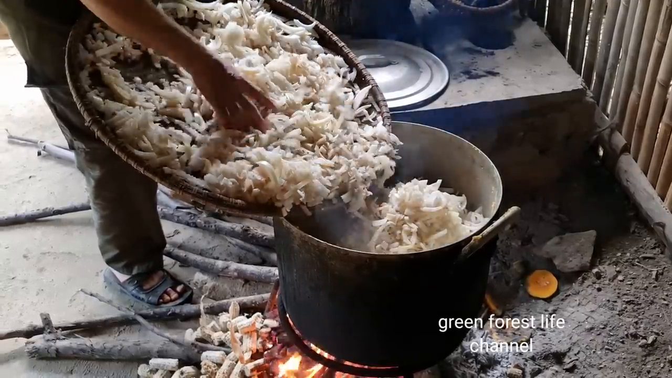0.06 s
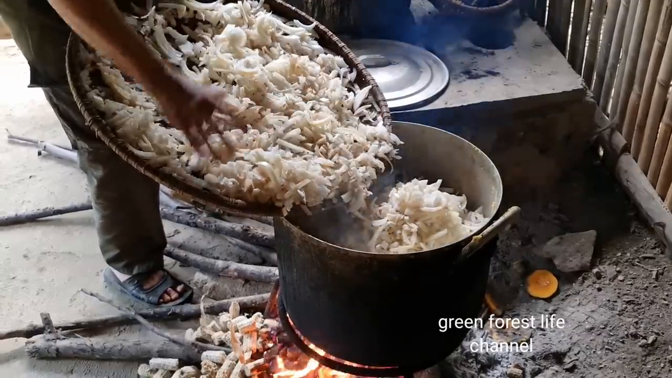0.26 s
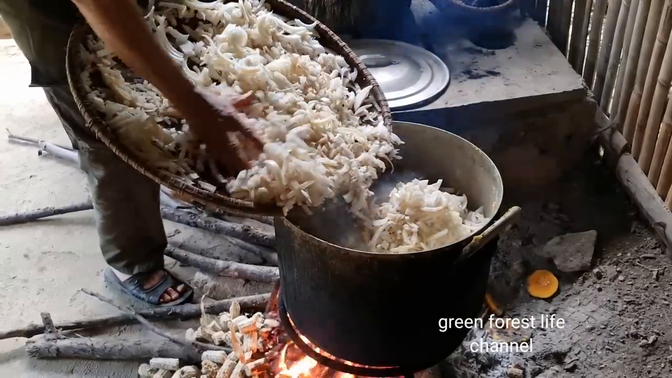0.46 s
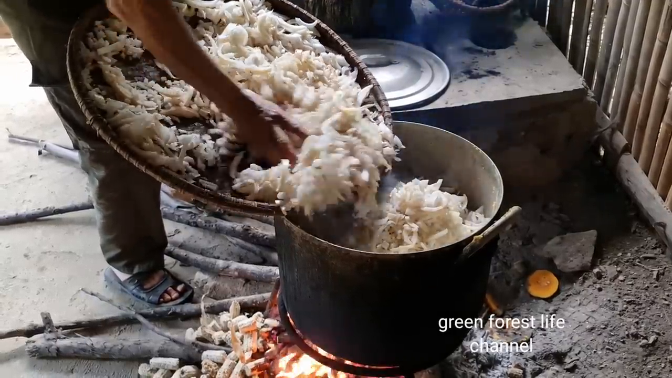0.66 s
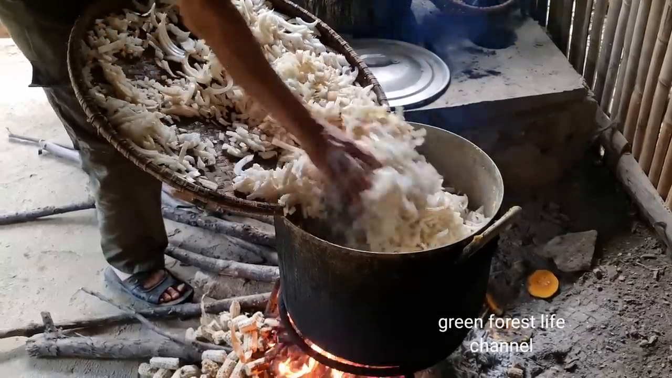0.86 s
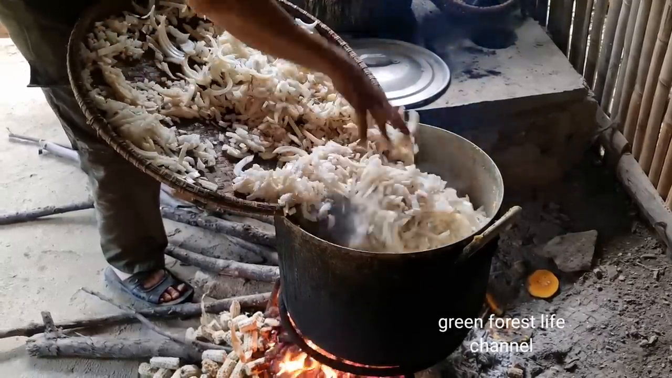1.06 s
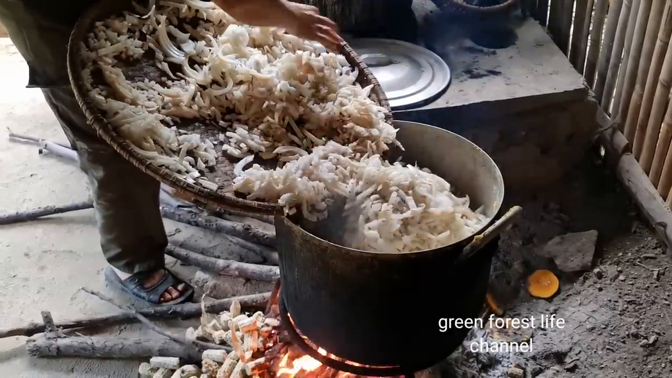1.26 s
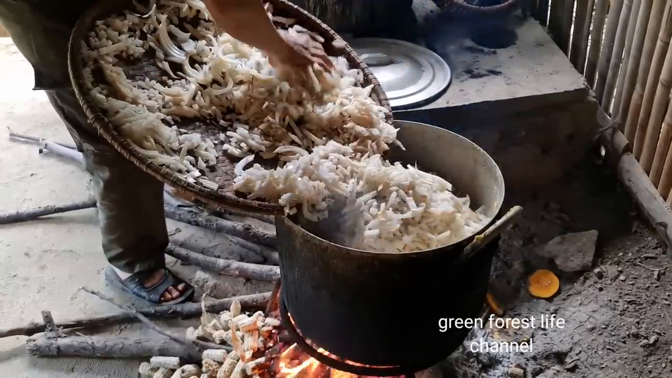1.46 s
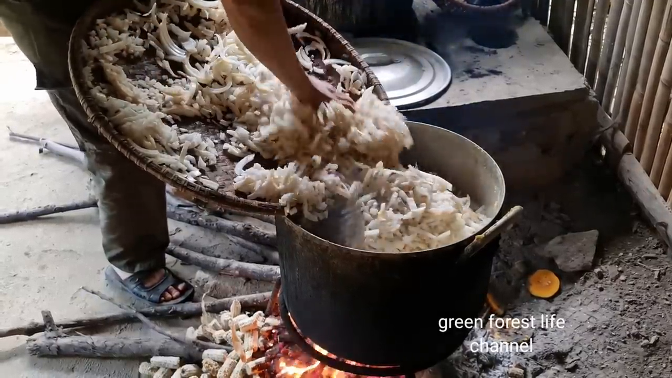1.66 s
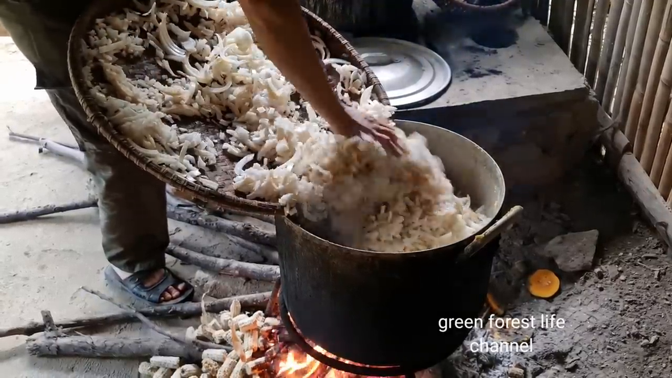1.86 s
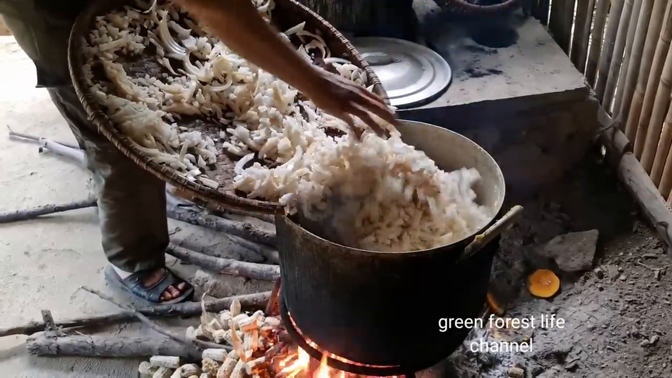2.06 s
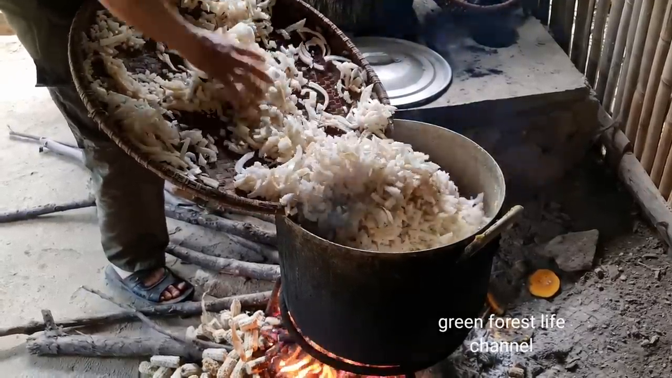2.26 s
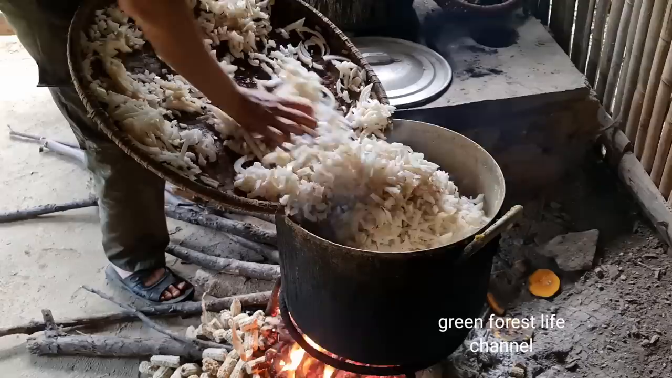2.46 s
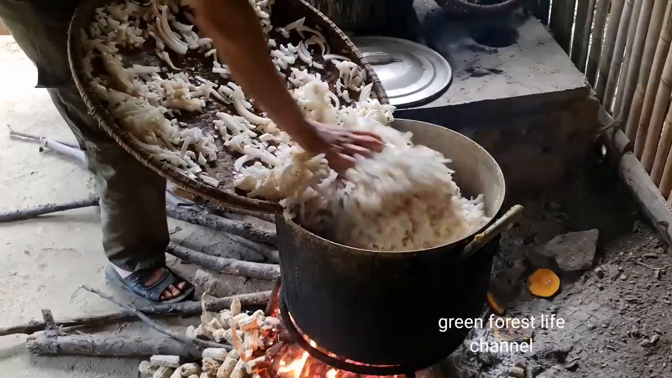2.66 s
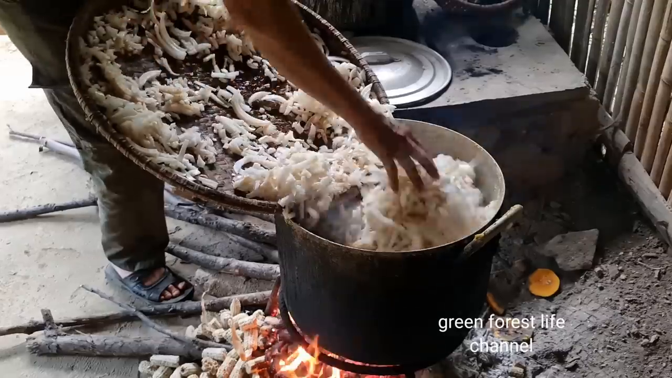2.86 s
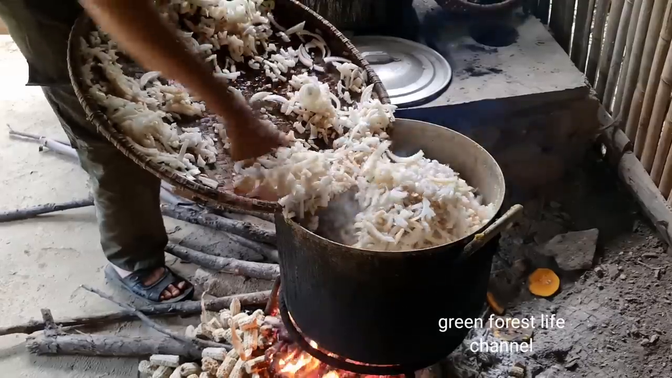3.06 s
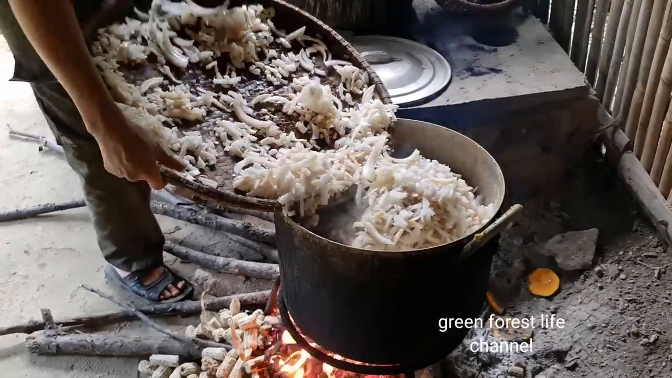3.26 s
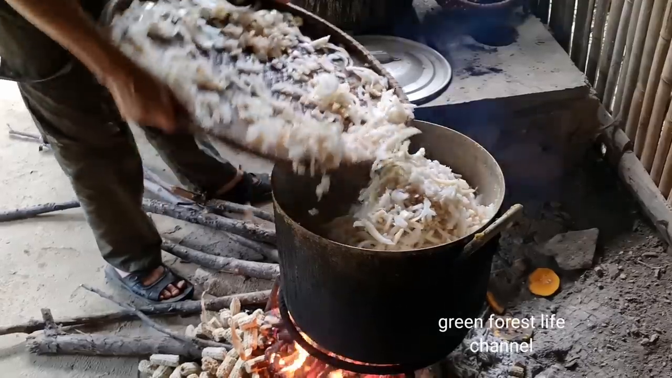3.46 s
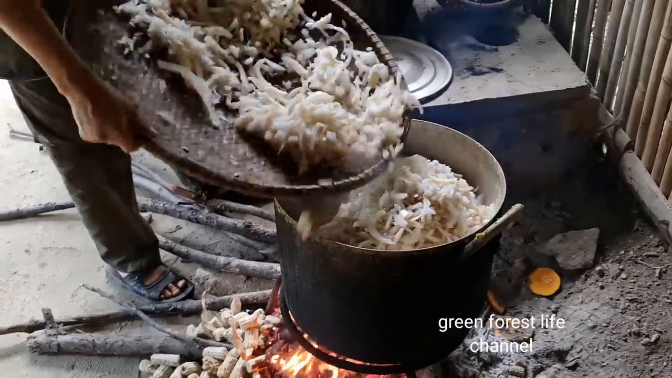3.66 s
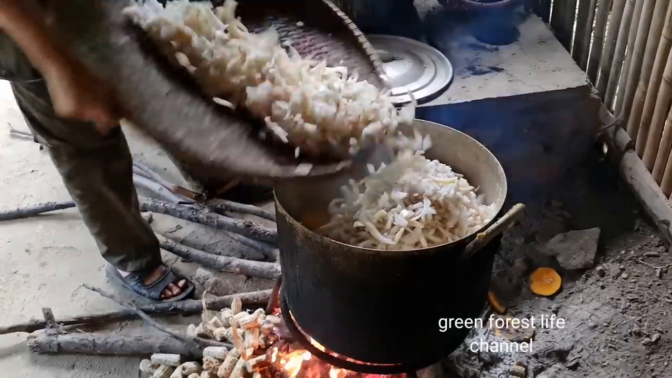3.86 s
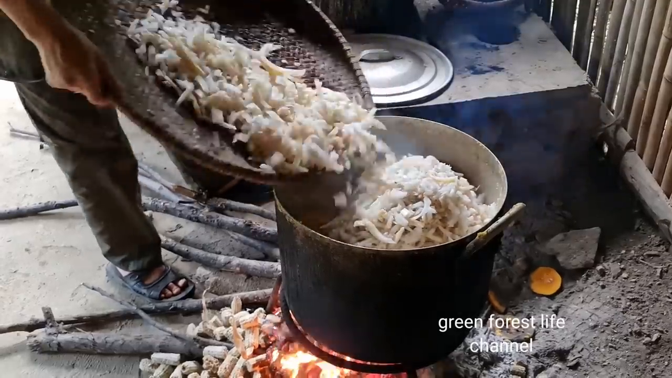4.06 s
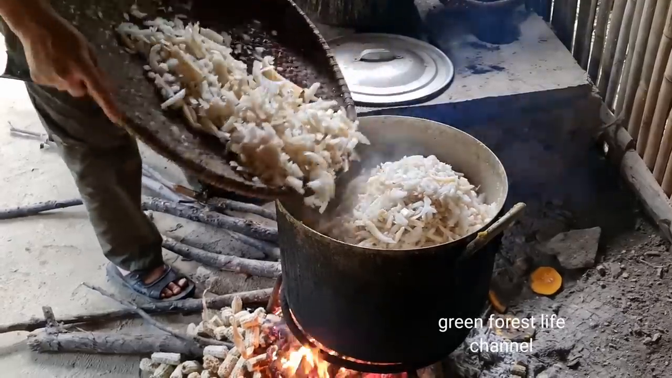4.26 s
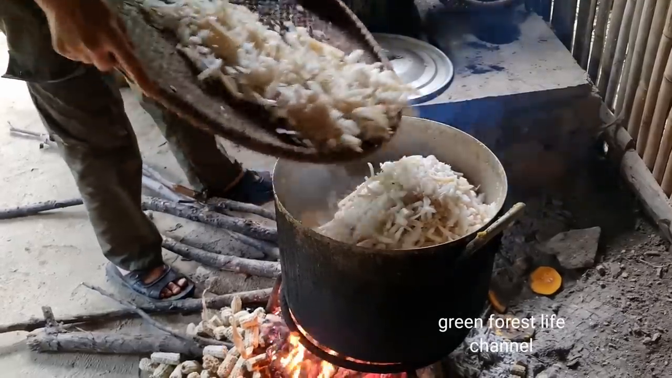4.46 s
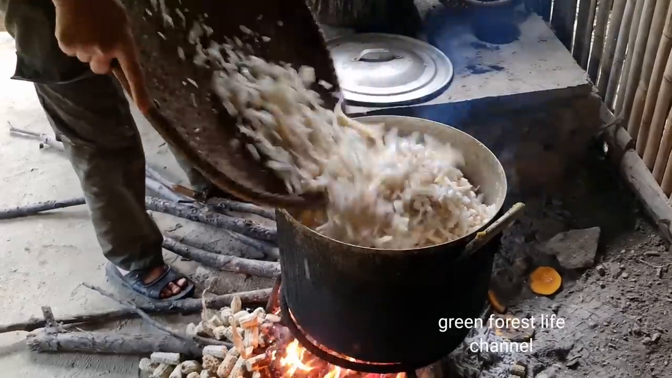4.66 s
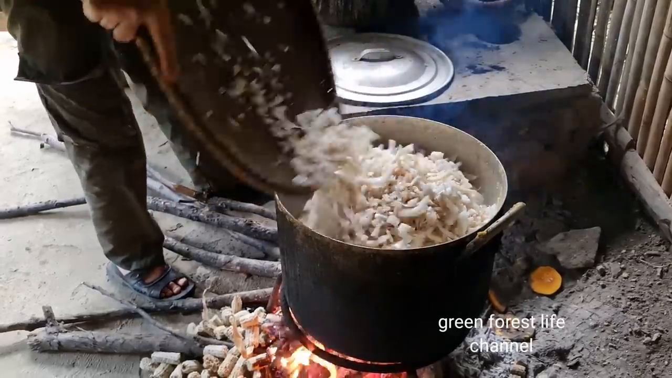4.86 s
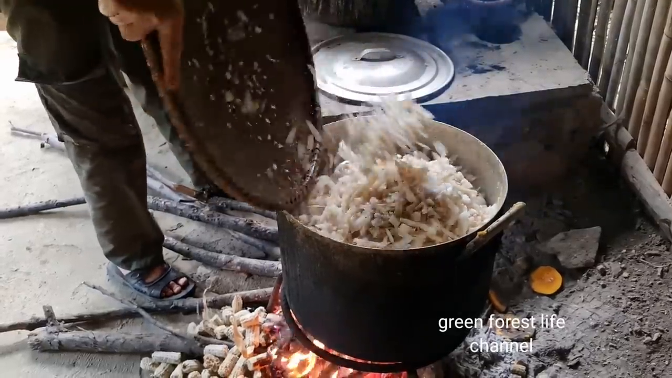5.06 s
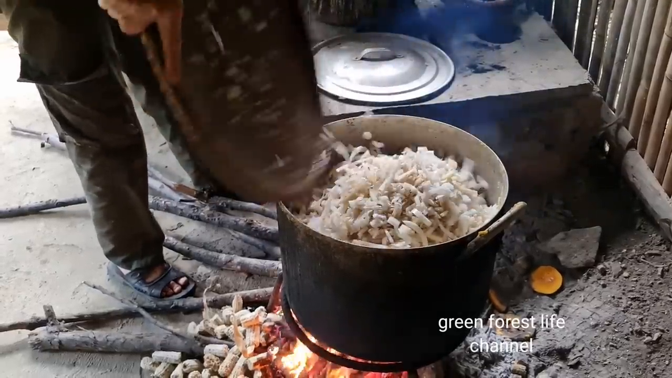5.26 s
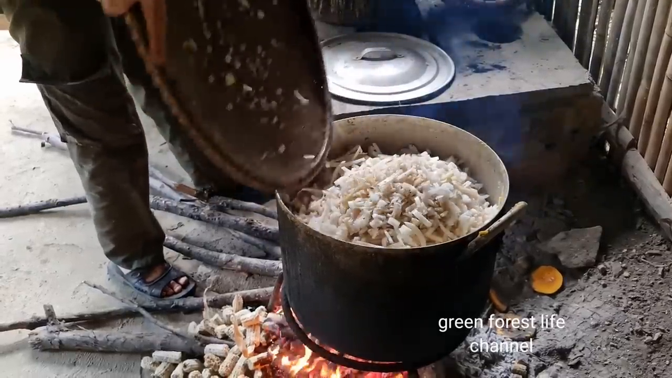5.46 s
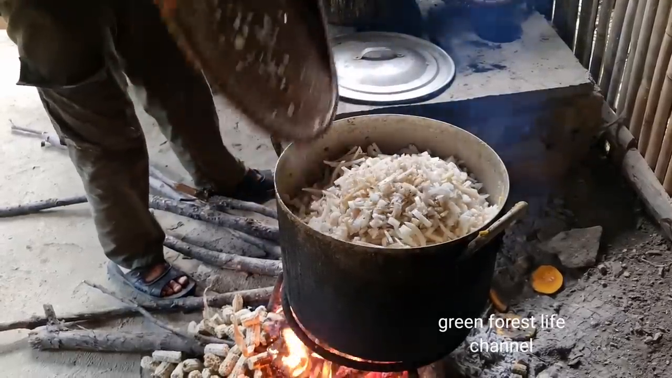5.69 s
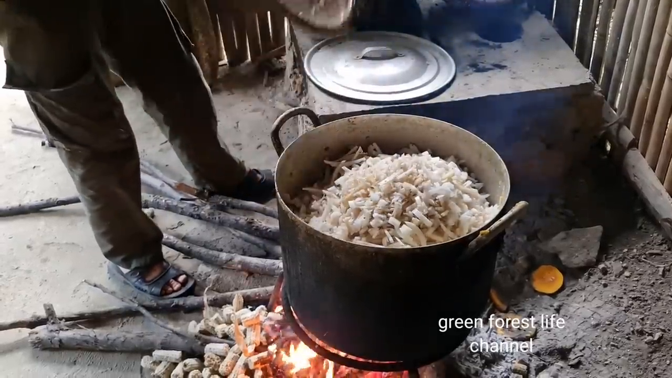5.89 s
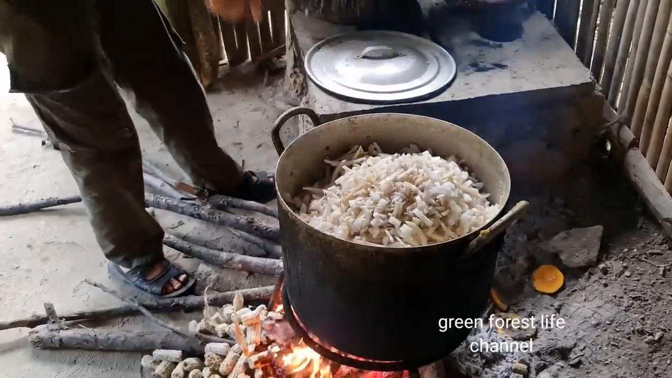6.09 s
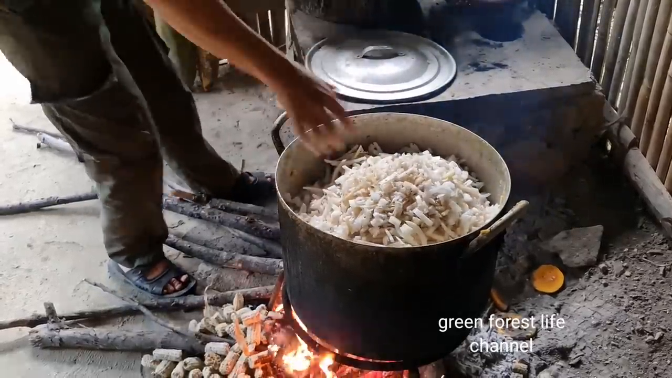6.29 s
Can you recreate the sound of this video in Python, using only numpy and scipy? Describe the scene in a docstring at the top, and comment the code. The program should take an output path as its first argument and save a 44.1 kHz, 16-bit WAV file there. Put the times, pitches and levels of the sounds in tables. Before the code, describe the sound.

Handfuls of stalks slide off a woven tray into a pot with sharp ticks, ending in several booming, rattling knocks.

```python
"""Shredded stalks into a pot over a wood fire

Handfuls of stalks are swept off a woven tray into a big pot: they patter and rustle on tray and heap
and set the pot humming, with sharp ticks from single pieces, twigs and sparks. The tray is knocked
empty on the rim, booming and rattling, and a sandal scuffs over grit. Insects buzz outside the open
hut; underneath runs a low rumble: the fire, and the tray's deep tail after the knocks."""
import sys
import numpy as np
from scipy import signal
from scipy.fft import rfft, irfft, next_fast_len
from scipy.io import wavfile
from scipy.ndimage import uniform_filter1d

SR = 44100
rng = np.random.default_rng(int(sys.argv[2]) if len(sys.argv) > 2 else 0)


def wrap_up_sound(samples):
    """Save the sound to the file named by the first command line argument, as 16-bit audio."""
    columns = np.atleast_2d(samples).T
    # keep every value between -1 and 1, then stretch to whole-number steps
    tamed = np.clip(columns, -1, 1)
    steps = np.round(tamed * 32767).astype(np.int16)
    wavfile.write(sys.argv[1], SR, steps)


N = 279153
T = np.arange(N) / SR

# fader moves of the ambience: (time [s], open air [dB], insects [dB], low rumble [dB]);
# the rumble is the fire, and the tray's deep tail after the knocks
AMBIENCE_LEVELS = [(0, -54, -59.5, -54.5), (.9, -49, -52.5, -42), (1.3, -50.5, -58, -50),
                   (1.6, -55, -55, -57.5), (3.4, -49, -57, -52), (4.05, -49, -56, -48),
                   (4.75, -49.5, -58.5, -59.5), (5.25, -55.5, -67.5, -49), (5.7, -56, -66.5, -56.5),
                   (5.95, -60, -66.5, -65), (6.33, -53.5, -58, -53.5)]


def amp(db):
    return 10 ** (np.asarray(db) / 20)


def unit(x):
    return x / np.sqrt(np.mean(x ** 2) + 1e-20)


def read(points, hz):
    """Value of a (frequency, value) curve, on a log frequency axis."""
    f, value = np.transpose(points)
    return np.interp(np.log(hz + 1), np.log(f + 1), value)


def fader(rows, column):
    """One column of a table, interpolated over time."""
    rows = np.array(rows)
    return np.interp(T, rows[:, 0], rows[:, column])


def colour(x, points):
    """Minimum-phase EQ through (frequency [Hz], gain [dB]) points."""
    log_gain = np.log(amp(np.maximum(read(points, abs(np.fft.fftfreq(4096, 1 / SR))), -90)))
    taps = np.fft.ifft(np.exp(np.conj(signal.hilbert(log_gain)))).real[:2048]
    return signal.oaconvolve(x, taps.reshape((1,) * (x.ndim - 1) + (-1,)), axes=-1)[..., :x.shape[-1]]


def ring(x, modes):
    """Resonator bank of (frequency [Hz], width [Hz], gain [dB]) modes."""
    poles = [(np.exp((2j * np.pi * hz - np.pi * width) / SR), db) for hz, width, db in modes]
    return sum(amp(db) * signal.lfilter([1 - abs(p)], [1, -p], x).imag for p, db in poles)


def grains(per_s, spread_db):
    """Random clicks, most small, a few large."""
    hit, size, sign = rng.random(N), rng.exponential(1, N), rng.standard_normal(N)
    return (hit < per_s / SR) * sign * amp(spread_db * np.minimum(size, 4))


def drift(samples):
    """Slow random modulation: noise smoothed over this many samples."""
    return unit(uniform_filter1d(rng.standard_normal(N), samples))


def swell(s, rise_s, hold_s, fall_db_per_s):
    """Envelope in dB: climbs 30 dB over rise_s, eases into full level at s, holds and falls."""
    rise_db = -30 * (np.maximum(s - T, 0) / rise_s) ** 1.3
    return rise_db - fall_db_per_s * np.maximum(T - s - hold_s, 0)


def add(mix, s, sound):
    part = mix[round(s * SR):][:len(sound)]
    part += sound[:len(part)]


def stalks():
    """Pieces thud into the pot, patter on the weave and rustle against each other."""
    # air and wall modes of the pot: (frequency [Hz], width [Hz], gain [dB])
    pot_modes = [(144.7, 24, -14), (182.8, 17, -2.5), (244.6, 67, -3), (349, 8, 4), (400, 160, 0),
                 (540, 120, -25), (600, 12, -11), (822, 160, 12), (1240, 210, 0), (1437, 60, -22.5)]
    # tone of the woody patter, dry rustle and wet fizz: (frequency [Hz], gain [dB])
    patter_eq = [(260, -22.5), (450, -13), (495, 0), (643, -7.5), (856, -3.5), (1220, -6.5), (3000, -18.5),
                 (3900, -46), (6600, -120)]
    rustle_eq = [(1500, -17), (2200, 3.5), (3200, 1.5), (4200, -2), (6000, -8), (8000, -23.5),
                 (12000, -75.5)]
    fizz_eq = [(4000, -31), (6000, -6.5), (8000, -8), (9800, -12.5), (12000, -12), (15800, -24)]
    # slides of stalks: (time of full flow [s], rise [s], hold [s], flow [dB], fall [dB/s],
    # pot over flow [dB], rustle over flow [dB], fizz over flow [dB])
    slides = [(0.0, 0.066, 0.0067, -26, 141, 1.5, -18.5, -22.5), (0.178, 0.52, 2.9, -55.5, 60, 7, -5, -8.5),
              (0.445, 0.034, 0.012, -34, 133, -1, 2.5, -12),
              (0.49, 0.19, 0.023, -26.5, 107, -5.5, -24, -22.5),
              (0.702, 0.26, 0.096, -26.5, 92, -3.5, -14.5, -23),
              (1.388, 0.052, 0.086, -38, 55, -22, -15, -20), (1.608, 0.25, 0.032, -22, 92, -3.5, -17, -29),
              (1.755, 0.094, .01, -37.5, 90, 7.5, -6, -15.5), (1.9, .05, .01, -38.5, 196, 4, -16, -20),
              (2.337, 0.021, 0.049, -32, 52.5, -1.5, -14.5, -20),
              (2.408, 0.08, 0.033, -26.5, 59.5, -3, -12.5, -18),
              (2.6, 0.37, 0.033, -32.5, 115, 1.5, -11.5, -40),
              (2.875, 0.081, 0.016, -40, 143, -12.5, -4, -33),
              (3.301, 0.1, 0.0087, -36.5, 95, 1, -9.5, -14.5),
              (3.414, 0.097, 0.016, -41, 108, 1, -6.5, -19),
              (3.628, 0.083, 0.027, -25, 58.5, -9, -18.5, -23),
              (3.704, 0.11, 0.031, -20, 150, -0.5, -14, -29), (3.799, .1, 0.012, -25.5, 300, 3, -21, -23.5),
              (3.89, 0.14, 0.027, -22.5, 300, 1, -18, -24.5),
              (3.987, 0.23, 0.076, -29.5, 86, 3.5, -19, -20.5),
              (4.34, 0.15, 0.011, -47, 58, -3.5, -11.5, -10.5),
              (4.677, 0.11, 0.013, -17.5, 352, -5, -19, -27.5),
              (4.79, .2, 0.041, -32.5, 108.5, -2.5, -15.5, -25)]
    # how far each layer follows a slide's rise and fall: (patter, pot, rustle, fizz) [factor on dB]
    follow = [1.0, 0.83, 0.8, 0.65]
    thuds, taps = grains(1300, spread_db=2.0), grains(2500, spread_db=3.2)
    low_cut = [(60, -48.5), (110, -34.5), (140, 4.0)]  # the open pot radiates no deep bass
    pot = unit(colour(ring(thuds, pot_modes[:5]), low_cut))
    patter = unit(colour(taps, patter_eq)) + 0.18 * unit(colour(thuds, patter_eq))
    patter += 0.23 * unit(colour(ring(taps, pot_modes[5:]), [(100, -33), (450, -5)]))
    rustle = unit(colour(unit(grains(5000, spread_db=1.0)) + 0.77 * unit(taps), rustle_eq))
    fizz = unit(colour(unit(grains(5800, spread_db=7.0)) + 1.1 * unit(taps), fizz_eq))
    power = np.zeros((4, N))
    for s, rise_s, hold_s, flow_db, fall, *over_db in slides:
        layer_db = flow_db + np.c_[[0, *over_db]]
        power += amp(layer_db + np.c_[follow] * swell(s, rise_s, hold_s, fall)) ** 2
    return (np.sqrt(power) * [unit(patter), pot, rustle, fizz]).sum(0)


def open_air():
    """A wide, soft bed of outdoor noise, its low end partly shared between left and right."""
    # tone of the air: (frequency [Hz], gain [dB])
    air_eq = [(65, -38.5), (110, -19.5), (214, -0.5), (324, 4.5), (644, -10), (1000, -11.5), (3000, -18.5),
              (5600, -18.5), (9000, -28.5), (15000, -25.5), (15800, -39)]
    air = unit(colour(rng.standard_normal((2, N)), air_eq))
    crossfeed = 0.13 * colour(air[::-1], [(300, 13.0), (800, -8.5)])
    return amp(fader(AMBIENCE_LEVELS, column=1)) * (air + crossfeed)


def insects():
    """Insects buzz in two high, narrow bands with a fast, wavering throb."""
    # bands of the buzz: (frequency [Hz], gain [dB])
    buzz_eq = [(4200, -30), (4600, -8), (5000, -6), (5300, -30), (6000, -30), (6250, -2), (6750, -1),
               (6950, -6), (7060, 2), (7250, -30)]
    throb_hz, throb_db = 33, 2.0
    buzz = unit(colour(rng.standard_normal((2, N)), buzz_eq))
    throb = amp(throb_db * np.sin(2 * np.pi * throb_hz * T + 3 * drift(samples=9000)))
    return amp(fader(AMBIENCE_LEVELS, column=2)) * throb * buzz


def low_rumble():
    """Lumpy bass noise, a little to the right: the fire, and the tray's deep tail after the knocks."""
    rumble_eq = [(20, -47), (45, -10.5), (70, 4.5), (100, -2), (140, 1), (300, -57.0)]
    rumble = unit(colour(rng.standard_normal((1, N)), rumble_eq))
    lumps, pan_db = amp(drift(samples=3000)), [[-1.5], [1.5]]
    return amp(fader(AMBIENCE_LEVELS, column=3) + pan_db) * lumps * rumble


def ticks():
    """Single pieces, twigs and sparks: dry knocks of a few uneven cycles, each led by a bright snap."""
    # (time [s], level [dB], pitch [Hz], snap over the ring [dB])
    cues = [(0.186, -39, 1100, -20), (0.234, -30, 1124, -27.5), (0.3205, -31, 1130, -20),
            (0.9222, -20, 2350, -28), (1.1176, -25, 3450, -22), (1.145, -23, 2360, -24),
            (1.293, -27, 3620, -17), (1.7826, -14, 1250, -30), (1.894, -23, 1030, -13),
            (2.3266, -31, 1240, -23), (2.756, -25, 1140, -20), (2.8524, -22, 1040, -12),
            (2.8888, -19.5, 1770, -17), (2.971, -23.5, 1750, -15), (3.2949, -18.5, 1160, -10),
            (3.6112, -15, 1200, -32), (3.7333, -4, 1340, -12.5), (3.8493, -16.5, 1220, -37),
            (3.916, -17, 1300, -16), (4.1058, -20.5, 1230, -26), (4.1754, -18, 1060, -27),
            (4.308, -30, 1090, -7), (4.3307, -26, 1050, -4), (4.35, -28, 1050, -3), (4.431, -27, 1090, -20),
            (4.803, -15, 1020, -24), (4.9789, -27, 1400, -11), (5.958, -43, 1300, -13),
            (6.0753, -42.5, 1760, 6), (6.2557, -26, 6000, -24)]
    snap_eq = [(1000, -21), (3000, -7), (4500, -1), (7000, -7), (15000, -27)]
    out, t = np.zeros(N), T[:3000]
    for s, db, hz, snap_db in cues:
        snap, rough = rng.standard_normal((2, len(t)))
        tone = np.sin(2 * np.pi * hz * t) * amp(-60 * t * hz / 19)  # dies in 19 cycles
        rough = .6 * unit(ring(rough, [(hz, .7 * hz, 0)])) * amp(-60 * t / .03)
        snap = unit(colour(snap, snap_eq)) * amp(snap_db - 60 * t / .012)
        add(out, s, amp(db) * (tone + rough + snap))
    return colour(out, [(150, -27), (600, -5)])


def tray_knocks():
    """A soft blow on the rim rings the tray; a crack leads it and the loose weave rattles after it."""
    # blows and rebounds: (time [s], boom [dB], deep swing over boom [dB], crack [dB],
    # crack treble lift [dB], rattle [dB], ring time [factor])
    blows = [(4.602, -3.5, -1, 3.5, -5, -16, 1.0), (4.636, -11, -24, -38, 1, -24.5, 0.69),
             (4.756, -14, -2, -42, -2, -30.5, 1), (5.099, 2, -1, -3, 0, -29.5, 0.68),
             (5.137, -11, -18, -37.5, -7, -31, 0.33), (5.327, -10.5, 9, -14.5, 13.5, -18, 0.83),
             (5.337, -29, 14, -15, 3, -17, 0.42), (5.552, -12, 6.5, -18.5, 9.5, -21.5, 0.89),
             (5.562, -24.5, 9, -42, -7, -33.5, 0.28)]
    # modes of the tray: (frequency [Hz], level [dB], base t60 [s])
    tray_modes = [(61.5, -7, 0.13), (88.6, -19.5, 0.34), (151.2, -14, 0.42), (172.8, -16, 0.36),
                  (178.8, 2.5, 0.082), (218.7, -10.5, 0.16), (291.2, -27, 0.39), (344.8, -15, 0.13),
                  (479, -17.5, 0.061), (663, -21.5, .08), (753, -27, 0.29), (1090, -6, 0.033),
                  (1510, -29, 0.045)]
    # tone of the crack and of the rattle: (frequency [Hz], gain [dB])
    crack_eq = [(300, -6), (1200, 1), (2200, -4), (3400, -9.5), (6000, -13.5), (9000, -27.5), (15000, -30)]
    rattle_eq = [(120, -14), (200, -0.5), (588, -9.5), (760, -9.5), (2540, -20), (3530, -21), (4310, -27.5),
                 (11000, -38), (15800, -75.5)]
    # decay of the rattle: (frequency [Hz], t60 [s])
    rattle_t60 = [(300, 0.24), (1500, 0.21), (3500, 0.21), (10000, 0.16)]
    crack_rise_s, crack_t60_s = .0006, .017
    out, t = np.zeros(N), T[:SR // 2]
    for s, boom_db, deep_db, crack_db, lift_db, rattle_db, ring_factor in blows:
        modes = [amp(db - 60 * t / (t60 * ring_factor)) * np.sin(2 * np.pi * hz * t)
                 for hz, db, t60 in tray_modes]
        boom = sum(modes[2:]) - amp(deep_db) * sum(modes[:2])  # the whole tray swings away first
        add(out, s + 0.00122, amp(boom_db) * boom * (1 - np.exp(-t / 0.0032)))
        crack, weave = rng.standard_normal((2, len(t)))
        crack = colour(unit(colour(crack, crack_eq)), [(1200, 0.0056), (4000, lift_db)])
        add(out, s, amp(crack_db - 60 * t / crack_t60_s) * crack * (1 - np.exp(-t / crack_rise_s)))
        hz, frame_s, bands = signal.stft(unit(colour(weave, rattle_eq)), SR, nperseg=256)
        decay = amp(-60 * frame_s / read(rattle_t60, hz)[:, None])
        rattle = signal.istft(bands * decay, SR, nperseg=256)[1][:len(t)]
        add(out, s, amp(rattle_db) * rattle * (1 - np.exp(-t / 0.00033)))
    return out


def sandal_scuff():
    """Grit dragged under a sole."""
    # tone of the grit: (frequency [Hz], gain [dB])
    grit_eq = [(290, -62.5), (500, -42.5), (1030, -6), (1260, -15), (1830, -5.5), (3270, -3), (5090, -17.5),
               (15000, -38)]
    drag_db = -41 + swell(s=6.15, rise_s=0.14, hold_s=0.051, fall_db_per_s=220)
    return amp(drag_db) * unit(colour(grains(5300, spread_db=3.0), grit_eq))


def hut(x, spread_db, lag):
    """Direct sound and short echoes cross-fade quickly among eight stereo places: wide and scattered."""
    # right side against left: (frequency [Hz], base phase lag [rad]) and (frequency [Hz], level [dB])
    right_lag = [(60, .3), (200, .2), (950, .9), (1400, 2), (3450, 3.5), (6000, 6), (15000, 20)]
    right_db = [(60, 3.5), (170, 1.5), (350, 3), (1000, 0), (6000, .8), (12000, 0)]
    # echo send for a sharp blow, which spread_db raises: (frequency [Hz], level [dB])
    echo_db = [(100, -28), (250, -9), (500, -5), (2000, -7), (10000, -8)]
    lag_factors, places_per_s, echo_t60_s = [1.0, .7, 1.3, .85, 1.4, 1.1, .6, 1.2], 23, 0.093
    size = next_fast_len(N + SR)
    hz, t = np.fft.rfftfreq(size, 1 / SR), T[:6000]
    side = amp(read(right_db, hz) / 2)
    wet = amp(read(echo_db, hz) + spread_db * np.clip(hz / 700, 0, 1))
    out = np.zeros((2, len(hz)), complex)
    for k, factor in enumerate(lag_factors):
        share = np.maximum(1 - abs((T * places_per_s - k) % 8 - 1), 0)  # triangular cross-fade
        direct = np.array([1 / side, side * np.exp(-1j * lag * factor * read(right_lag, hz))])
        taps = rng.standard_normal((2, len(t))) * amp(-60 * t / echo_t60_s) * (t > .003)
        echo = rfft(taps / np.linalg.norm(taps, axis=1, keepdims=True), size) * wet
        out += rfft(x * share, size) * (direct + echo)
    return irfft(out / np.sqrt(1 + wet ** 2), size)[:, :N]


def scene():
    """Ticks, pour, scuff and knocks sound in the hut, over a bed of air, insects and low rumble."""
    mix = hut(ticks(), spread_db=0, lag=.7)
    # the pour is spread over tray and pot, so more of it arrives scattered
    mix += hut(stalks() + sandal_scuff(), spread_db=14.0, lag=1.05)
    mix += hut(tray_knocks(), spread_db=3.5, lag=.45)  # the rim is nearer the middle
    return mix + open_air() + insects() + low_rumble()


def record(dry):
    """The microphone drops the deepest bass and saturates on the hardest blows; a low-pass follows."""
    bass_cut = colour(dry, [(15, -11), (45, -2), (70, 0.5)])
    saturated = 1.214 * np.tanh(bass_cut / 1.184)
    low_pass = signal.firwin(511, cutoff=15750, window=("kaiser", 9), fs=SR)
    return signal.oaconvolve(saturated, low_pass[None], "same")


dry = scene()
out = record(dry)
wrap_up_sound(out)
```